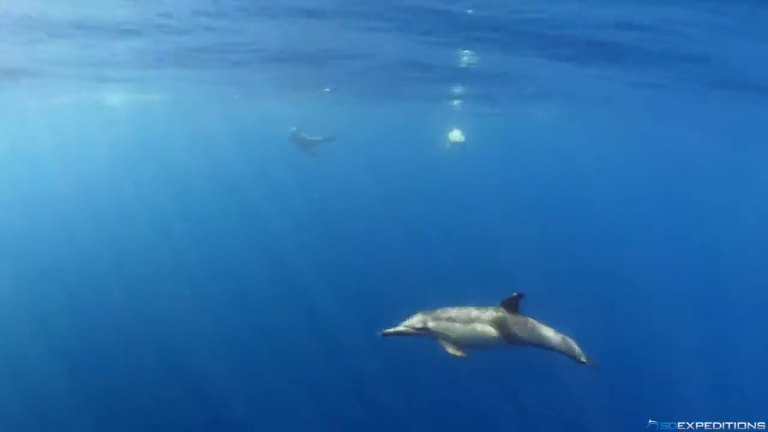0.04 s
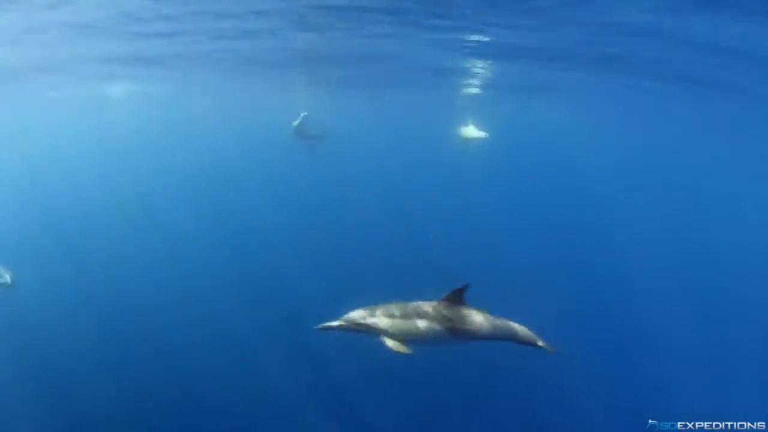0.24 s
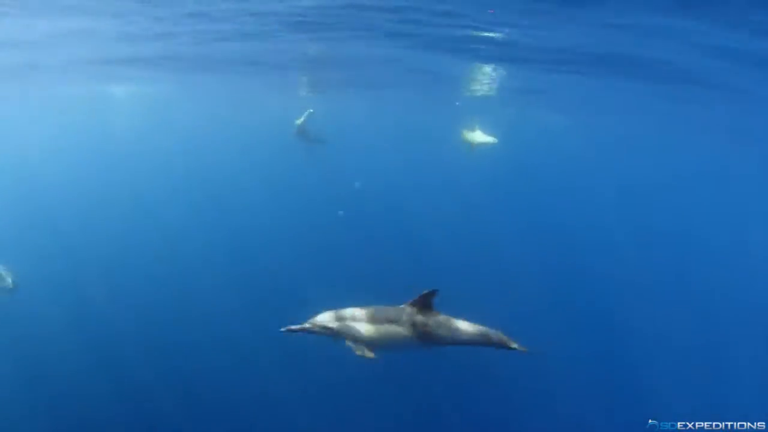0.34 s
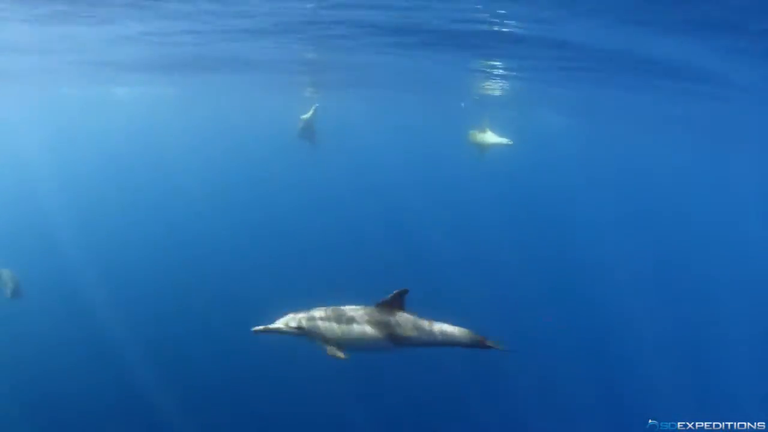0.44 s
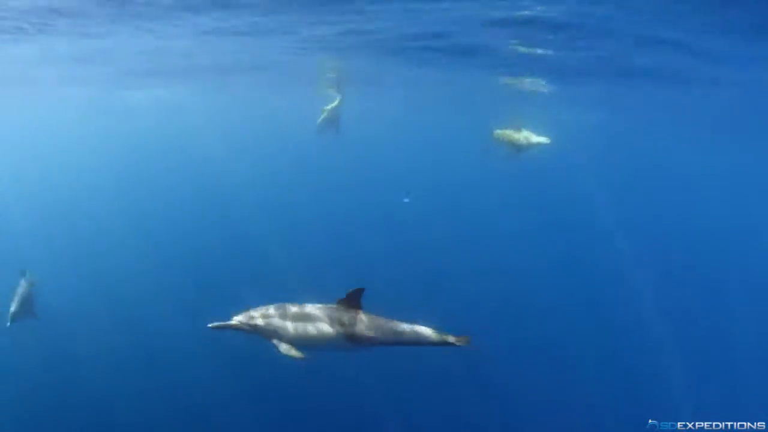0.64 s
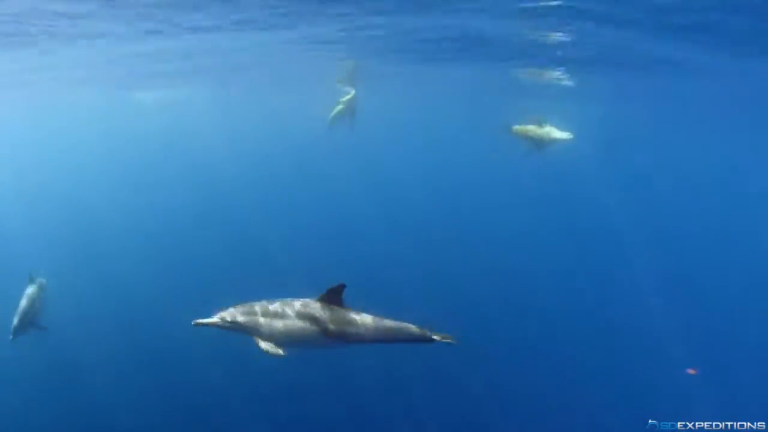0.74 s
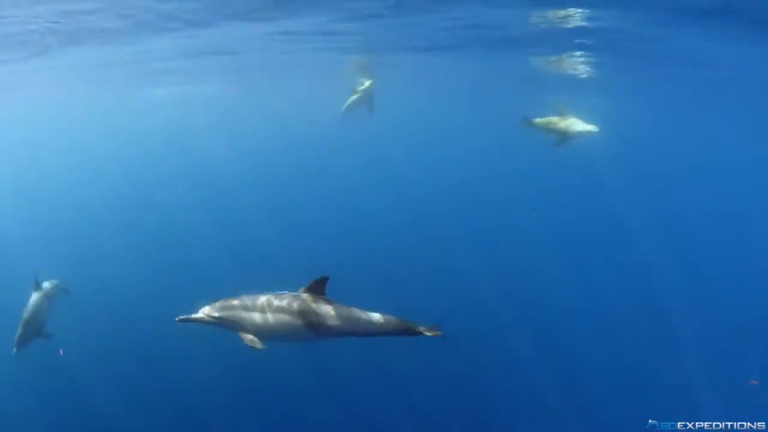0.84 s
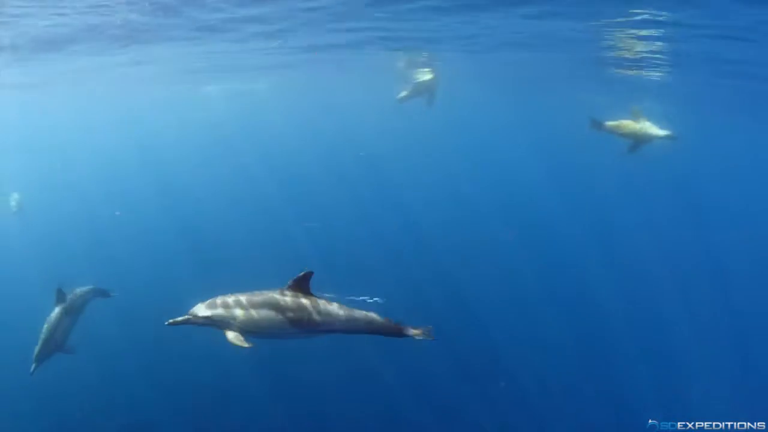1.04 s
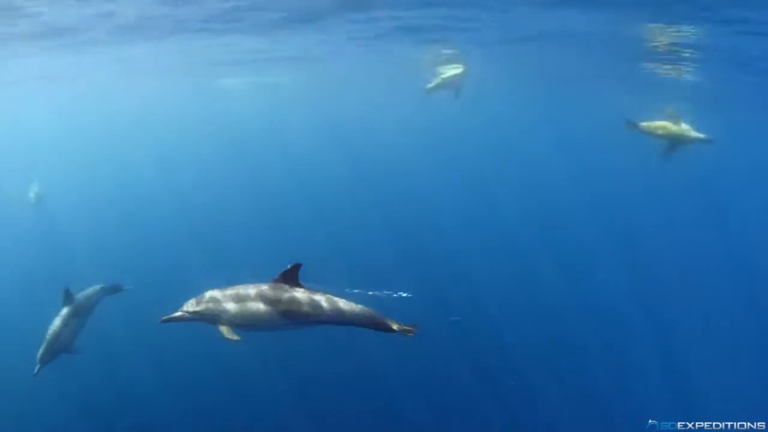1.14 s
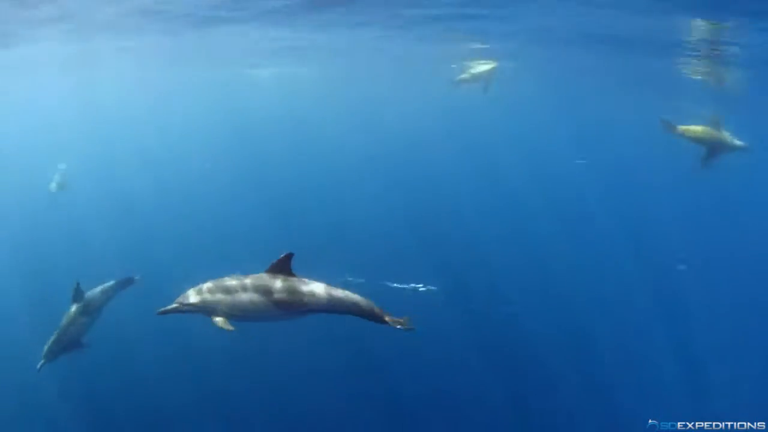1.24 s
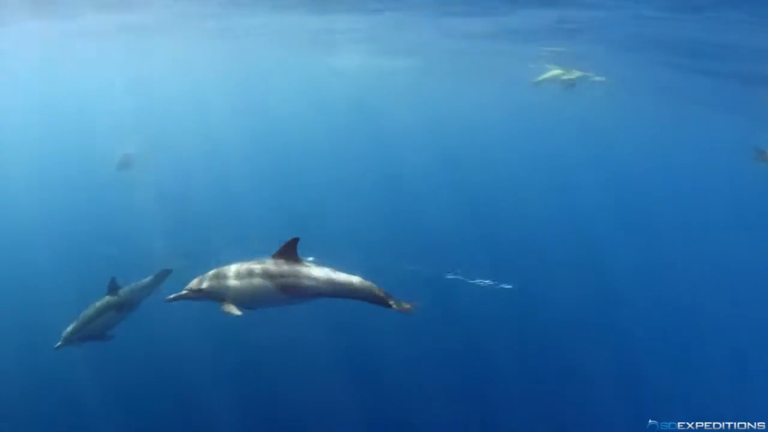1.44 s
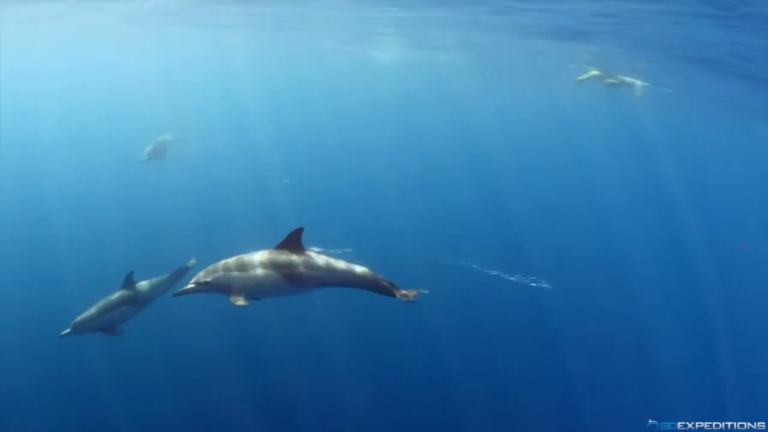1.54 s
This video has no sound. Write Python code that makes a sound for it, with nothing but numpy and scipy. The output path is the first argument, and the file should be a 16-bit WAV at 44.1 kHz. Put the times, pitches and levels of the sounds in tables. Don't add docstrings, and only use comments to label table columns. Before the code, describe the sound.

Dolphins clicking rapidly and whistling upward underwater as a hollow bubble gurgle booms and fades

```python
import sys
import numpy as np
from scipy import signal
from scipy.fft import rfft, irfft
from scipy.io import wavfile
from scipy.ndimage import uniform_filter1d

SR = 44100
rng = np.random.default_rng(int(sys.argv[2]) if len(sys.argv) > 2 else 0)


def to_wav(sig):
    pcm = np.clip(np.atleast_2d(sig), -1, 1) * 32767
    pcm = np.round(pcm).astype(np.int16)
    wavfile.write(sys.argv[1], SR, pcm.T)


def voltage_ratio(decibels):
    exponent = np.asarray(decibels, float) / 20
    return 10 ** exponent


N = 70560

# start_s, peak_db
FIRST_CLICKS = [(0.0088, -54), (0.0347, -55), (0.0532, -46), (0.0821, -53), (0.1046, -59), (0.126, -45.5),
                (0.149, -55), (0.1709, -52.5), (0.194, -52), (0.2153, -51), (0.2368, -51), (0.2578, -45.5),
                (0.2788, -46), (0.3001, -48.5), (0.3216, -48.5), (0.3425, -51), (0.3625, -52), (0.384, -51),
                (0.4059, -50.5), (0.4278, -52), (0.4513, -49), (0.4792, -50.5), (0.5161, -50)]
# start_s, peak_db
SECOND_CLICKS = [(0.816, -56), (0.852, -50), (0.8878, -50), (0.9202, -52), (0.95, -51), (0.952, -50),
                 (0.9848, -48.5), (1.0166, -48), (1.046, -50), (1.0746, -50.5), (1.1012, -49),
                 (1.1276, -48), (1.1538, -58), (1.1796, -59), (1.2061, -61), (1.232, -45), (1.2586, -47),
                 (1.284, -45), (1.312, -46.5), (1.3384, -47), (1.3668, -48), (1.3983, -49), (1.431, -47),
                 (1.4705, -49)]
# start_s, peak_db, left_over_right_db, housing_knock_db
NEAR_CLICKS = [
    (1.2075, -51, 7, -53),
    (1.2907, -46.5, -5, -56),
    (1.3223, -44.5, 1.5, -52),
    (1.3633, -41.5, 2, -50),
    (1.4108, -42, 0, -49.5),
    (1.4614, -43, 1.0, -45.5),
    (1.5238, -43.5, -5, -48),
    (1.5841, -44.5, 0, -48),
]
# pitch_hz, level_db
CLICK_SPECTRUM = [(2350, -62), (4000, -42), (4900, -76), (6470, -2), (7620, -10.5), (11000, 7), (12800, 5),
                  (16000, 2.5)]
# pitch_hz, width_hz, level_db, left_right_likeness (-1..1)
WALL_MODES = [(635, 25, 1.5, 0.9), (1050, 35, 0.5, 0.2), (1348, 60, -2.5, -.4), (1650, 110, -6, -0.5),
              (1876, 60, -1, -0.76), (1990, 45, 1.5, -0.49), (2330, 32, -11, 0.2)]
# start_s, pitch_hz, level_db
WHISTLE_GLIDES = [
    [(.714, 8700, -68), (.732, 10300, -64), (.750, 10950, -55), (.760, 10750, -56), (.778, 12400, -49),
     (.796, 14100, -48), (.803, 14750, -57), (.814, 15000, -57), (.820, 15050, -75)],
    [(1.156, 8250, -64), (1.18, 8330, -53), (1.2, 8800, -47), (1.213, 9350, -50), (1.222, 9400, -51),
     (1.236, 9950, -55), (1.25, 10050, -56), (1.264, 13300, -58), (1.272, 13900, -72)],
]
# start_s (middle of the pulse), peak_db, pitch_hz
LARGE_BUBBLES = [(0.229, -29, 389.3), (0.245, -35.5, 433), (0.26, -36, 378), (0.269, -27.5, 320),
                 (0.282, -20, 362.6), (0.283, -44, 275), (0.294, -31.5, 436), (0.312, -33, 422),
                 (0.329, -35, 421), (0.342, -26, 366), (0.35, -33.5, 333), (0.369, -25, 399),
                 (0.377, -37.5, 430), (0.389, -40, 315), (0.394, -32.5, 384), (0.408, -36, 368),
                 (0.413, -44, 444), (0.425, -32.0, 375), (0.426, -43.5, 306), (0.448, -34, 432),
                 (0.457, -33.5, 351), (0.459, -49, 422), (0.468, -28.5, 416), (0.484, -37, 361),
                 (0.499, -30.5, 400), (0.507, -40.5, 450), (0.52, -35, 432), (0.529, -48.5, 438),
                 (0.54, -34.4, 407), (0.553, -43.5, 413), (0.567, -34.5, 415), (0.587, -39, 378),
                 (0.605, -44, 397), (0.615, -47.5, 332), (0.627, -37.5, 370), (0.64, -49, 407),
                 (0.65, -35.5, 412), (0.662, -50, 440), (0.673, -36, 390), (0.687, -41, 382),
                 (0.719, -41.5, 400), (0.749, -46.5, 375), (0.767, -46, 417), (0.779, -43, 356),
                 (0.796, -48.5, 377), (0.842, -50, 396), (0.871, -47, 413), (0.889, -50, 400),
                 (0.979, -49, 370), (1.0, -48.5, 373), (1.316, -51, 346), (1.33, -49.5, 314),
                 (1.333, -42.5, 405), (1.349, -48, 373), (1.366, -54.5, 406), (1.384, -52, 367),
                 (1.414, -46, 396), (1.433, -52.5, 413), (1.463, -53, 390), (1.548, -48.5, 414)]
# pitch_hz, width_hz, level_db
AIR_MODES = [(400, 60.4, 1.5), (627.6, 70.6, -23.5), (850.7, 58.5, -28), (1034.7, 36, -27.5),
             (1425, 45, -33.5), (2032, 60, -41.5), (2536, 7.9, -42), (2600, 29, -66)]
# left_over_right_db, opposite_sign_share (0..1)
PORT_PATTERNS = [(-1, 0.017), (-6, 0.0033), (20.5, 0.87), (-3.5, 0.45), (-3, 0.69), (-3, 0.79), (-11, 0.76),
                 (10, 0.55)]
# start_s, level_db
STIRRED_WATER = [(0, -63), (0.206, -63), (0.222, -42), (0.299, -42), (.47, -48), (.69, -53.5),
                 (0.802, -60.5), (0.951, -60), (1.28, -58.5), (1.33, -57), (1.6, -60.5)]
# start_s, peak_db, pitch_hz,
# t60_s
POP_EVENTS = [(.004, -47, 280, 0.17), (.045, -41.5, 285, 0.054), (.054, -48, 10700, .01),
              (0.0585, -42, 12800, .008), (.089, -34, 370, 0.03), (.086, -47, 207, 0.039),
              (.108, -46, 10900, 0.0056), (.112, -41, 10760, 0.006), (.163, -49, 861, 0.1),
              (.186, -53, 11100, .008), (.254, -41, 10870, 0.0086), (.266, -45, 10400, 0.018),
              (.273, -40, 4930, 0.0073), (.088, -39, 686, 0.082), (.094, -42.5, 5880, 0.0081),
              (.110, -48.5, 6600, 0.0086), (0.123, -36, 5620, 0.012), (0.254, -37.5, 8300, 0.0096),
              (.272, -40.5, 94.4, 0.16), (0.272, -22.5, 226, 0.015), (.243, -43, 6500, 0.0076),
              (.296, -51, 11100, 0.0087), (0.512, -33.5, 206, 0.074), (.653, -48, 8870, 0.012),
              (0.704, -52.5, 6700, 0.016), (.918, -42.5, 1014, 0.047), (0.996, -48.5, 2620, 0.034),
              (1.000, -42, 7000, 0.015), (1.026, -29, 10730, 0.015), (1.047, -42, 1467, 0.028),
              (1.143, -30.5, 10800, 0.0094), (1.151, -30.5, 12650, 0.013), (1.141, -53, 1312, 0.16),
              (1.208, -36.5, 985, 0.024)]
# start_s, rise_s, hold_s, fall_s, level_db
FIZZ_SWELLS = [
    (.222, .025, .04, .075, -60),
    (.05, .005, .08, .03, -77),
    (1.138, .003, .045, .02, -63),
]
# pitch_hz, level_db
FIZZ_SPECTRUM = [(1590, -31), (2700, -5), (4250, -8.5), (5560, -5.5), (7660, -10), (10800, -4.5),
                 (13400, -7), (16000, -35)]
# start_s, rise_s, hold_s, fall_s, level_db
HAZE_SWELLS = [
    (.71, 0.0031, 0.063, 0.017, -67),
    (1.138, 0.0027, 0.118, 0.0067, -58),
]
WINDOW_HZ = (2805, 6540, 8800, 10930, 12300)
# pitch_hz, level_db
SEA_SPECTRUM = [(710, -45), (1200, 0), (1980, -2.5), (2250, -2), (4360, -6), (11100, -3), (15000, -7),
                (16000, -3.5)]
# pitch_hz, level_db
RUMBLE_SPECTRUM = [(12, -42), (20, -20), (295, -2), (387, -4.5), (489, -34.5), (1030, -14), (1500, -76),
                   (1950, -88), (3300, -120)]


def rms_one(x):
    return x / np.sqrt(np.mean(x ** 2) + 1e-20)


def drift(rate_hz):
    r = np.exp(-2 * np.pi * rate_hz / SR)
    wander = signal.lfilter([1], [1, -2 * r, r * r], rng.standard_normal(N + SR))
    return rms_one(wander[SR:])


def pair(alike):
    mid, side = rng.standard_normal((2, N))
    opposite = side * np.array([[1], [-1]])
    return (np.sqrt(1 + alike) * mid + np.sqrt(1 - alike) * opposite) / np.sqrt(2)


def colour(x, spectrum):
    hz = np.arange(N // 2 + 1) * SR / N + 1
    point_hz, point_db = np.transpose(spectrum)
    gain_db = np.interp(np.log(hz), np.log(point_hz), point_db)
    return irfft(rfft(x) * voltage_ratio(gain_db), N)


def resonance(x, hz, width_hz):
    r = np.exp(-np.pi * width_hz / SR)
    zeros = np.array([1, 0, -1]) * (1 - r * r) / 2
    poles = [1, -2 * r * np.cos(2 * np.pi * hz / SR), r * r]
    return signal.lfilter(zeros, poles, x + 1e-18)


def pan(left_over_right_db):
    return voltage_ratio(np.array([[left_over_right_db / 2], [-left_over_right_db / 2]]))


def swells(rows):
    t, level = np.arange(N) / SR, 0
    for start, rise, hold, fall, db in rows:
        growth = np.clip((t - start) / rise, 0, 1)
        decay = np.exp(-np.maximum(t - start - rise - hold, 0) / fall)
        level = level + voltage_ratio(db) * growth * decay
    return level


def burst(length_s, alike):
    t, rise_s = np.arange(SR // 20) / SR, 0.0008
    envelope = np.exp(-t / length_s) * (1 - np.exp(-t / rise_s)) ** 2
    spectrum = rfft(pair(alike)[:, :len(t)] * envelope)
    smooth_power = uniform_filter1d(np.abs(spectrum) ** 2, size=30, axis=1)
    puff = irfft(spectrum / np.sqrt(smooth_power), len(t))
    return puff / np.sqrt(np.sum(puff ** 2, axis=1, keepdims=True))


def train(rows, template):
    marks = np.zeros((2, N))
    for start, db, side_db in rows:
        marks[:, int(start * SR)] += voltage_ratio(db) * pan(side_db)[:, 0]
    return signal.fftconvolve(marks, template, axes=1)[:, :N]


def rattle(x, echo_db):
    t60_s = 0.016
    tail = burst(t60_s / np.log(1000), -0.36)
    return x + voltage_ratio(echo_db) * signal.fftconvolve(x, tail, axes=1)[:, :N]


def clicks():
    first = [(s, db + 1.5, -0.6) for s, db in FIRST_CLICKS]
    second = [(s, db + 1.5, -1 + 6 * max(s - 1.0, 0)) for s, db in SECOND_CLICKS]
    near = [row[:3] for row in NEAR_CLICKS]
    out = 0
    for rows in (first, second, near):
        for version in range(3):
            out = out + train(rows[version::3], burst(0.0013, 1.0))
    return colour(out, CLICK_SPECTRUM) * voltage_ratio(12)


def knocks():
    length_s = 0.0029
    rows = [(s, knock_db, 0) for s, _, _, knock_db in NEAR_CLICKS]
    thump = sum(train(rows[version::3], burst(length_s, -0.28)) for version in range(3))
    wall_band = signal.butter(4, (940, 2310), "band", fs=SR, output="sos")
    wall = signal.sosfilt(wall_band, thump)
    rings = 0
    for hz, width_hz, db, alike in WALL_MODES:
        strike = train(rows, burst(length_s, alike))
        rings = rings + voltage_ratio(db) * resonance(strike, hz, width_hz)
    return voltage_ratio(41.5) * rings + voltage_ratio(27) * wall


def whistles():
    t, out = np.arange(N) / SR, 0
    for glide in WHISTLE_GLIDES:
        s, hz, db = np.transpose(glide)
        pitch_hz = np.interp(t, s, hz) * (1 + 0.004 * drift(200))
        flutter_db = 4 * drift(450)
        level = voltage_ratio(np.interp(t, s, db, -150, -150) + flutter_db)
        out = out + np.sqrt(2) * level * np.sin(2 * np.pi * np.cumsum(pitch_hz) / SR)
    return out * np.ones((2, 1))


def bubbles():
    out, half = np.zeros(N), SR // 40
    t = np.arange(-half, half) / SR
    envelope = np.exp(-0.5 * (t / 0.005) ** 2)
    for s, db, hz in LARGE_BUBBLES:
        start = int(s * SR) - half
        out[start:start + len(t)] += voltage_ratio(db) * envelope * np.sin(2 * np.pi * hz * t)
    return pan(-1.33) * out


def housing(boom, overtones):
    out = 0
    for k, ((hz, width_hz, db), (side_db, share)) in enumerate(zip(AIR_MODES, PORT_PATTERNS)):
        drive = overtones if k else boom
        same, opposite = resonance(resonance(drive, hz, 1.45 * width_hz), hz, 1.53 * width_hz)
        ports = np.sqrt(1 - share) * same + np.sqrt(share) * opposite * np.array([[1], [-1]])
        out = out + ports * pan(side_db) * voltage_ratio(db) * (-1) ** k
    return out


def stirring():
    s, db = np.transpose(STIRRED_WATER)
    db = np.interp(np.arange(N) / SR, s, db)
    boom_db = np.minimum(db - 3, -54)
    overtone_db = 9.5 + db.max() + 0.89 * (db - db.max()) + 1.5 * drift(30)
    norm = np.sqrt(SR / 2 / AIR_MODES[0][1])
    return norm * housing(voltage_ratio(boom_db) * pair(0), voltage_ratio(overtone_db) * pair(0))


def pops():
    out, noise = np.zeros((2, N)), pair(0.28)
    for s, db, hz, t60 in POP_EVENTS:
        i = int(s * SR)
        t = np.arange(min(N - i, SR // 5)) / SR
        sound = np.sin(2 * np.pi * hz * t)
        if hz > 2000:
            width_hz = 0.33 * hz
            snap = resonance(resonance(noise[:, i:i + len(t)], hz, width_hz), hz, width_hz)
            sound = 0.7 * sound + 0.49 * rms_one(snap)
        rise = (1 - np.exp(-t / (0.072 * t60))) ** 2
        out[:, i:i + len(t)] += voltage_ratio(db - 60 * t / t60) * rise * sound
    return out


def fizz():
    grain = voltage_ratio(4 * drift(200))
    high_pass = signal.butter(4, 10400, "high", fs=SR, output="sos")
    haze = rms_one(signal.sosfilt(high_pass, pair(0.43)))
    spray = rms_one(colour(pair(0.35), FIZZ_SPECTRUM))
    hiss = grain * swells(FIZZ_SWELLS) * spray + swells(HAZE_SWELLS) * haze
    window = sum(resonance(hiss, hz, 0.04 * hz) for hz in WINDOW_HZ)
    return 0.5 * hiss + 1.5 * window


def sea():
    lumps = voltage_ratio(1.5 * drift(15))
    hiss = rms_one(colour(pair(0.033), SEA_SPECTRUM))
    rumble = rms_one(colour(pair(0.91), RUMBLE_SPECTRUM))
    return voltage_ratio(-66.5) * hiss + voltage_ratio(-63.5) * lumps * rumble


def scene():
    dolphins = rattle(clicks(), -4.5) + knocks() + rattle(whistles(), -2.5)
    splash = bubbles() + stirring() + pops() + fizz()
    return dolphins + splash + sea()


def roll_off(x):
    return signal.sosfilt(signal.butter(12, 16480, fs=SR, output="sos"), x)


def record(dry):
    low_pass = signal.cheby2(10, 30, 15950, fs=SR, output="sos")
    mix = signal.sosfilt(low_pass, dry)
    return roll_off(mix)


dry = scene()
out = record(dry)
to_wav(out)
```